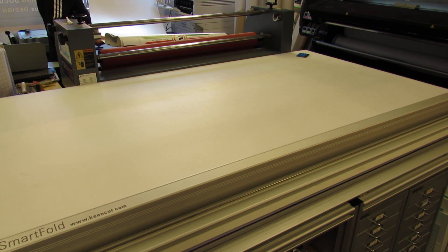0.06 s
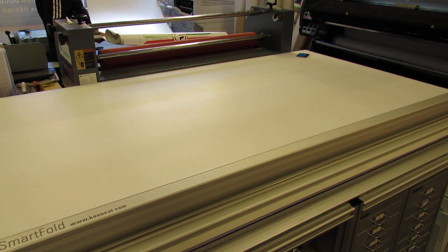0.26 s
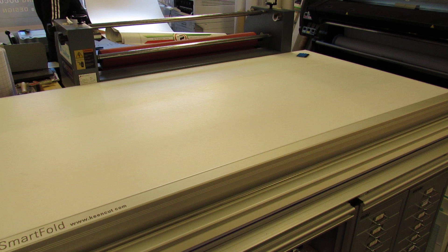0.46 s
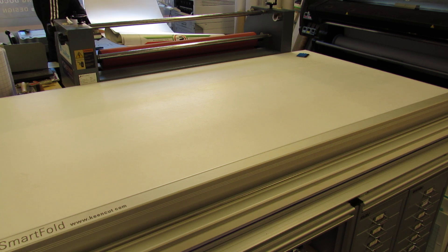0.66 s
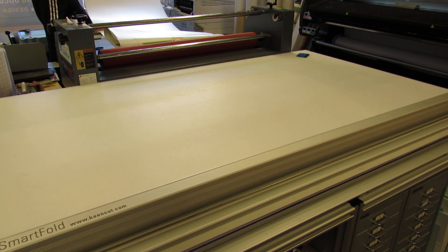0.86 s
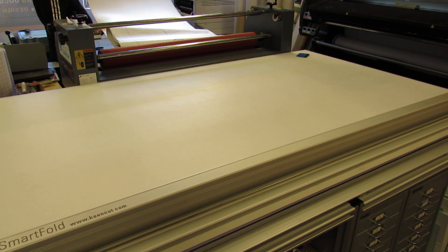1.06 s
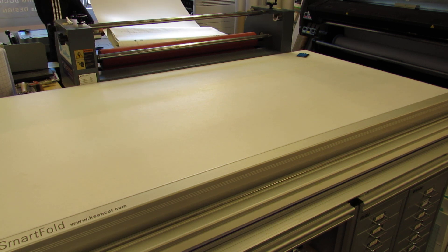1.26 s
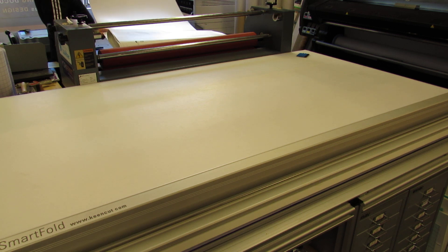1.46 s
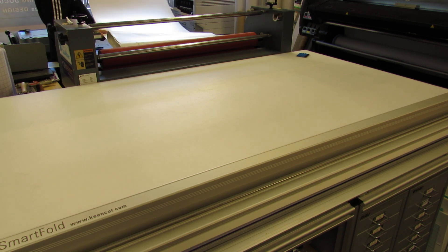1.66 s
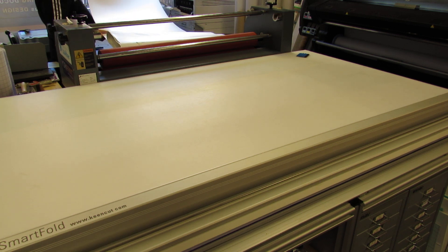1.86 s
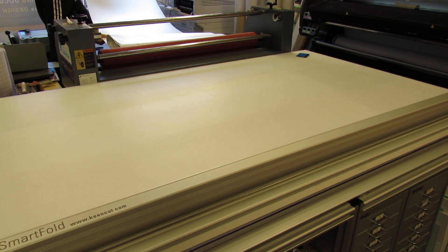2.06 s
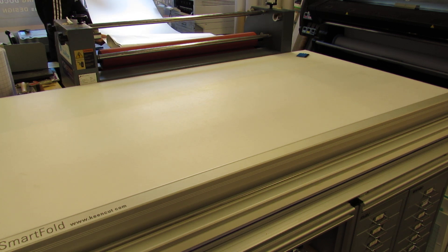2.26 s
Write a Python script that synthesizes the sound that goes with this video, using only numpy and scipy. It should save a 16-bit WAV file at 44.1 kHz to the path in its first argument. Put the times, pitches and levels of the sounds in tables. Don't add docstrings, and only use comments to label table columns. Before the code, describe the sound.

A stiff sheet slaps hard onto a bench twice, slides briefly, cracks sharply against a roller, then settles with soft dull thuds; steady motor hum and fan noise around, hard workshop room, close stereo microphone.

```python
import sys
import numpy as np
from scipy import signal
from scipy.fft import rfft, irfft, next_fast_len
from scipy.io import wavfile
from scipy.ndimage import map_coordinates

SR = 44100
rng = np.random.default_rng(int(sys.argv[2]) if len(sys.argv) > 2 else 0)


def output_pcm(signal):
    pcm = np.clip(np.atleast_2d(signal).T, -1, 1) * 32767
    wavfile.write(sys.argv[1], SR, np.round(pcm).astype(np.int16))


def gain_from_db(level_db):
    decades = np.asarray(level_db, float) / 20
    return 10 ** decades


N = 101430

# (frequency [Hz], rms level [dB], wander [dB])
MOTOR_TONES = [(49, -58.5, 2), (246.5, -49.5, 3), (494.3, -55.5, 2.5), (1036, -71, 2)]
# (frequency [Hz], level [dB])
MOTOR_WHINE = [(1564.5, -59.5), (1490, -70), (1639, -72)]
# (time [s], level on the tones [dB])
MOTOR_LOAD = [(0, 2), (.25, 1), (.45, 1.5), (.75, 1), (1.4, 2), (1.7, 0.5), (2.3, 0)]
TWIN_HZ, TWIN_DB, BEAT_S, QUIET_AT_S, TWIN_SHARE = 95.9, -48.5, 0.99, 0.7, 0.41
# (frequency [Hz], density [dB per Hz])
FAN_COLOUR = [(30, -22), (65, -21.5), (170, 1), (450, -2.5), (1300, -16), (2200, -27.5), (4000, -36.5),
              (15000, -37)]
FAN_DB, FAN_WANDER_DB, FAN_FOLLOWS_LOAD = -43.5, 0.8, 0.43

# (frequency [Hz], likeness [-1..1])
MOTOR_ALIKE = [(50, 0.11), (100, 0.65), (250, 0.95), (1500, 0.82)]
FAN_LIKENESS = [(60, 0.076), (180, 0.19), (550, 0.57), (1650, 0.58), (4970, 0.45), (15000, 0.062)]
TAIL_ALIKE = [(60, 0.1), (180, 0.66), (550, 0.68), (1650, 0.98), (4970, 0.94), (15000, 0.05)]
DIRECT_ALIKE = [(3000, 0.99), (6000, 0.94), (10000, 0.87), (15000, 0.41)]
# (frequency [Hz], t60 [s])
ROOM_T60 = [(150, 0.34), (1000, 0.46), (3000, 0.5), (8000, 0.44), (15000, 0.31)]
TAIL_BUILD_S = 0.0078

# (time [s], level [dB], fall t60 [s], tap over level [dB], boom over level [dB])
THUD_EVENTS = [(0.253, -36, 0.069, -24, 0), (0.295, -45, 0.16, -30, 0), (0.44, -36.5, 0.099, -32, 0),
               (0.857, -38, 0.13, -11, -8), (1.329, -43.5, 0.17, 2, -22), (1.42, -44, 0.58, -3, -29),
               (1.703, -37.5, 0.18, -2, -2), (1.718, -39.5, 0.13, -6, -1), (1.744, -45.5, 0.14, -16, 0),
               (1.776, -47, .15, -12, -17), (1.854, -38, 0.085, -42.5, -22.5),
               (1.910, -38, 0.13, -11.5, -26), (1.936, -40.5, 0.15, -23, -24),
               (1.981, -44.5, 0.094, -25, -17)]
# (frequency [Hz], width [Hz], level [dB])
BOARD_RESONANCES = [(271, 51, -1), (380, 99, -0.5), (525, 77, -1.5)]
BENCH_BOOM = [(103, 81, -11.5), (171, 55, 3.5), (221, 72, -13)]
# (frequency [Hz], density [dB])
TAP_COLOUR = [(300, -50.5), (600, 13), (1000, 7.5), (1800, -2), (2400, -25), (3400, -14.5), (5000, -18),
              (15000, -19.5)]
# (frequency [Hz], level [dB], t60 [s])
BENCH_MODES = [(156, 0, 0.25), (192, -3, .1), (496, -4, 0.17), (1012, -13, 0.22), (390, -3, .15)]
TABLE_MODES = [(169.7, -3.5, 0.56), (217.5, 1, 0.27), (272, -0.5, 0.26)]
BENCH_S, BENCH_DB, TABLE_S, TABLE_DB = 1.715, -6.5, 0.27, -7
THUD_RISE_S, TAP_RISE_S, THUD_WET_DB = 0.01, 0.0086, -3.5

# (time [s], level [dB], hiss over it [dB], scrape over it [dB])
SLIDE_COURSE = [(0.296, -34.5, -14, -18), (.38, -45, -3, -20), (.45, -39.5, -8.5, -11),
                (.5, -39.5, -21, -10), (.68, -48, -13, -29), (.76, -53, -4, -19), (.82, -45.5, -3.5, -20),
                (.87, -45, 0, -2), (.91, -50, 5.5, 5.5), (0.945, -61.5, 11, -14), (.985, -51.5, -8, -15),
                (1.12, -51, -6, -27), (1.2, -53.5, -3, -18), (1.27, -53.5, 1, -20), (1.33, -49, -7.5, -12),
                (1.48, -65, -6, -16), (1.62, -60, -5, -24), (2.3, -66, 2, -20)]
# (frequency [Hz], density [dB])
RUB_COLOUR = [(300, 1.5), (800, -3), (1200, 2.5), (2600, -4), (4000, -14), (8000, -23), (15000, -58)]
HISS_COLOUR = [(1500, 8), (3000, -13.5), (4000, -3), (6300, -1.5), (9000, -2), (13000, -8.5), (15000, -10)]
# (frequency [Hz], width [Hz], level [dB])
SCRAPE_RESONANCE = [(2500, 800, 0)]

# (time [s], level [dB])
SNAP_EVENTS = [
    (.9886, -18),
    (.9930, -15),
    (1.0006, -19),
]
# (frequency [Hz], width [Hz], level [dB])
CRACK_RESONANCES = [(594, 98, 2), (895, 190, 5), (4100, 3000, 6), (8400, 7200, -25)]
# (frequency [Hz], density [dB])
RATTLE_COLOUR = [(300, -14), (550, 8.5), (950, -4), (1500, -8.5), (4200, -4.5), (6500, -9.5),
                 (10000, -10.5), (15000, -33)]
SNAP_TO_ROOM = [(250, 6), (550, 12), (950, 9.5), (1500, -12), (2500, -2), (4300, 3.5), (8000, -3.5),
                (15000, -12)]
# (frequency [Hz], level [dB], t60 [s])
ROLLER_MODES = [(548, 0, 0.086), (480, -3.5, 0.091), (900, -5, 0.09), (952, -8, .08)]
SNAP_GAIN_DB, RATTLE_DB, ROLLER_DB, SNAP_WET_DB, SNAP_TAIL_DB = 6, -6.5, -4, -1.5, 1.5

# (time [s], level [dB], rise [s], fall t60 [s])
SLAP_EVENTS = [
    (.2260, -27.5, 0.012, 0.14),
    (.5150, -27.5, 0.0096, 0.44),
]
# (time [s], level [dB], rise [s], fall t60 [s])
EDGE_CONTACTS = [
    (0.2229, -16, 0.00026, 0.0022),
    (0.2245, -25, 0.0016, 0.049),
]
# (time [s], level [dB], fall t60 [s])
FIRST_SLAP_HITS = [(.2318, -25, .02), (.2357, -25, .015), (.2388, -24, .012), (.2422, -28, .012),
                   (.2452, -28, .02), (.2535, -28, .02)]
SECOND_SLAP_HITS = [(.5190, -31, .02), (.5250, -32, .02), (.5310, -33, .03), (.5470, -35, .03),
                    (.5550, -36, .03)]
# (frequency [Hz], density [dB])
EDGE_COLOUR = [(150, -11), (500, 4.5), (2000, -17), (4000, -30), (8000, -38), (15000, -48)]
FIRST_COLOUR = [(90, -17), (250, 0.5), (450, -1), (750, -10), (1080, 2.5), (2200, -2.5), (6300, -5),
                (15000, -12.5)]
SECOND_COLOUR = [(150, -42), (350, -6.5), (750, -3.5), (1100, 1.5), (1600, 1), (2400, -2.5), (4000, -5.5),
                 (15000, -17.5)]
# (frequency [Hz], level [dB], t60 [s])
FRAME_MODES = [(1040, -1, 0.14), (1060, -5, 0.094), (1670, 0, 0.25), (1970, 9, 0.11), (6620, 33, 0.062),
               (6100, 15, .04), (3060, -11, 0.11)]
SHEET_MODES = [(1521, 0, .045), (1460, -6, .05), (960, -9, .1), (1995, -11, .1), (2262, -10, .1),
               (3806, -11, .08), (1838, -12, .1)]
FRAME_S, SHEET_S, SHEET_DB, RING_DB = 0.2355, 0.530, 4, -25
HIT_RISE_S, SLAP_WET_DB, BURST_WET_DB, SENT_DB = 0.001, 1, -4.5, -3

# (frequency [Hz], level [dB])
LEFT_OVER_RIGHT = [(60, -3), (240, 4), (950, 1.5), (3770, 0.0), (15000, -0.5)]
TREBLE_FALL = [(14800, 0), (15600, -14), (16500, -40)]
NOTCH_HZ, NOTCH_WIDE_HZ, NOTCH_LEFT = 673.6, 367, 0.13


def unit(x):
    return x / np.sqrt(np.mean(x ** 2) + 1e-20)


def along(points, hz):
    f, v = np.transpose(points)
    return np.interp(np.log(hz + 1), np.log(f + 1), v)


def over_time(times, values):
    return np.interp(np.arange(N) / SR, times, values)


def wobble(count):
    knots = rng.standard_normal(int(N * count / SR) + 4)
    return map_coordinates(knots, [np.arange(N) * count / SR])


def filtered(x, response):
    m = next_fast_len(N + SR // 2)
    return irfft(rfft(x, m) * response(np.fft.rfftfreq(m, 1 / SR)), m)[..., :N]


def noise(spectrum, grit_db, shape=1):
    def colour(hz):
        gain = gain_from_db(along(spectrum, hz))
        return gain / np.sqrt(np.mean(gain ** 2))
    white = unit(gain_from_db(grit_db * wobble(count=900)) * rng.standard_normal(N))
    return filtered(shape * white, colour)


def resonances(table):
    def response(f):
        total = 0
        for k, (centre, width, db) in enumerate(table):
            damping = 1j * f * width
            total = total + (-1) ** k * gain_from_db(db) * damping / (centre * centre - f * f + damping)
        return total
    return response


def shaken(table):
    return unit(filtered(rng.standard_normal(N), resonances(table)))


def blow(s, db, rise, t60):
    t = np.arange(N) / SR - s
    return gain_from_db(db - 60 * np.clip(t - rise, 0, None) / t60) * np.clip(t / rise, 0, 1)


def ring(modes, s):
    t = np.clip(np.arange(N) / SR - s, 0, None)
    top = max(db for _, db, _ in modes)
    tones = sum(gain_from_db(db - top + RING_DB - 60 * t / t60) * np.sin(2 * np.pi * hz * t) for hz, db, t60 in modes)
    return tones * (1 - np.exp(-t / 0.0012))


def spread(pair, alike):
    def mid_side(hz):
        turn = np.arccos(np.clip(along(alike, hz), -1, 1)) / 2
        return np.array([np.cos(turn), np.sin(turn)])
    mid, side = filtered(pair, mid_side)
    return np.array([mid + side, mid - side])


def room(x, wet_db):
    hz, t, z = signal.stft(rng.standard_normal((2, SR)), SR, nperseg=256)
    tail = signal.istft(z * gain_from_db(-60 * t / along(ROOM_T60, hz)[:, None]), SR, nperseg=256)[1]
    tail = tail * (1 - np.exp(-np.arange(tail.shape[1]) / SR / TAIL_BUILD_S))
    wet = signal.fftconvolve(x[None], tail / np.linalg.norm(tail[0]), axes=1)[:, :N]
    direct = spread(np.array([x, np.roll(x, SR // 1000)]), DIRECT_ALIKE)
    return direct + gain_from_db(wet_db) * spread(wet, TAIL_ALIKE)


def hum():
    t = np.arange(N) / SR
    swing = np.cos(2 * np.pi * (t - QUIET_AT_S) / BEAT_S)
    beat = np.sqrt(np.abs(1 + TWIN_SHARE ** 2 - 2 * TWIN_SHARE * swing))
    total = gain_from_db(TWIN_DB) * beat * np.sin(2 * np.pi * TWIN_HZ * t + 0.22 * wobble(count=3))
    load_db = over_time(*np.transpose(MOTOR_LOAD))
    for hz, db, wander_db in MOTOR_TONES:
        level = gain_from_db(db + 3.5 + load_db + wander_db * wobble(count=22))
        total = total + level * np.sin(2 * np.pi * hz * t + 0.67 * wobble(count=10))
    return total


def whine():
    t = np.arange(N) / SR
    return sum(gain_from_db(db + 1.5 * wobble(count=8)) * np.sin(2 * np.pi * hz * t + 0.4 * wobble(count=6))
               for hz, db in MOTOR_WHINE)


def fan():
    load_db = over_time(*np.transpose(MOTOR_LOAD))
    level = gain_from_db(FAN_FOLLOWS_LOAD * load_db + FAN_WANDER_DB * wobble(count=8))
    return noise(FAN_COLOUR, grit_db=0.5) * level


def machines():
    motors = spread(np.array([hum(), hum()]), MOTOR_ALIKE)
    fans = spread(np.array([fan(), fan()]), FAN_LIKENESS)
    return whine() + motors + gain_from_db(FAN_DB) * fans


def thuds():
    board, boom, tap = 0, 0, 0
    for s, db, t60, tap_db, boom_db in THUD_EVENTS:
        board = board + blow(s, db, THUD_RISE_S, t60)
        boom = boom + blow(s, db + boom_db, 2 * THUD_RISE_S, t60)
        tap = tap + blow(s, db + tap_db, TAP_RISE_S, 1.01 * t60)
    contact = board * shaken(BOARD_RESONANCES) + boom * shaken(BENCH_BOOM) + noise(TAP_COLOUR, 0.75, tap)
    bench = gain_from_db(BENCH_DB) * ring(BENCH_MODES, BENCH_S)
    table_top = gain_from_db(TABLE_DB) * ring(TABLE_MODES, TABLE_S)
    return room(contact + bench + table_top, THUD_WET_DB)


def slide():
    s, db, hiss_db, scrape_db = np.transpose(SLIDE_COURSE)
    level = gain_from_db(np.interp(np.arange(N) / SR, s, db, left=-120) + 1.2 * wobble(count=30))
    rub = noise(RUB_COLOUR, grit_db=1.0)
    hiss = gain_from_db(over_time(s, hiss_db)) * noise(HISS_COLOUR, grit_db=-0.5)
    scrape = gain_from_db(over_time(s, scrape_db)) * shaken(SCRAPE_RESONANCE)
    return room(level * (rub + hiss + scrape), 0.33)


def snaps():
    spikes, tail_spike = np.zeros(N), np.zeros(N)
    for s, db in SNAP_EVENTS:
        spikes[round(s * SR)] = -gain_from_db(db + SNAP_GAIN_DB)
    tail_spike[round(SNAP_EVENTS[1][0] * SR)] = gain_from_db(SNAP_TAIL_DB - 32)
    crack = filtered(spikes, lambda f: sum(resonances([row])(f) for row in CRACK_RESONANCES))
    after = sum(blow(s, db + RATTLE_DB, 0.00032, 0.015006) for s, db in SNAP_EVENTS)
    rattle = noise(RATTLE_COLOUR, 0.66, after)
    roller = gain_from_db(ROLLER_DB) * ring(ROLLER_MODES, SNAP_EVENTS[2][0])
    sent = filtered(tail_spike, lambda hz: gain_from_db(along(SNAP_TO_ROOM, hz)))
    return room(crack + rattle + roller, SNAP_WET_DB - 2.5) + room(sent, 30.7)


def slap_hits(table):
    return sum(blow(s, db, HIT_RISE_S, t60) for s, db, t60 in table)


def first_slap():
    s, _, rise, _ = SLAP_EVENTS[0]
    edge = noise(EDGE_COLOUR, 1.3, sum(blow(*row) for row in EDGE_CONTACTS))
    burst = noise(FIRST_COLOUR, 1.4, blow(*SLAP_EVENTS[0]) + slap_hits(FIRST_SLAP_HITS))
    spike = filtered(np.arange(N) == round((s + rise) * SR), lambda hz: gain_from_db(along(FIRST_COLOUR, hz)))
    sent = spike * np.linalg.norm(burst) / np.linalg.norm(spike) * gain_from_db(SENT_DB - 31)
    near = room(edge + burst + ring(FRAME_MODES, FRAME_S), SLAP_WET_DB + BURST_WET_DB)
    return near + room(sent, 30 + SLAP_WET_DB)


def second_slap():
    burst = noise(SECOND_COLOUR, 1.3, blow(*SLAP_EVENTS[1]) + slap_hits(SECOND_SLAP_HITS))
    return room(burst + gain_from_db(SHEET_DB) * ring(SHEET_MODES, SHEET_S), SLAP_WET_DB - 3.0)


def scene():
    return machines() + thuds() + slide() + snaps() + first_slap() + second_slap()


def band_limit(x):
    return signal.sosfilt(signal.butter(12, 15050, fs=SR, output="sos"), x)


def record(dry):
    def ports(f):
        edge = NOTCH_HZ ** 2 - f * f
        width = 1j * f * NOTCH_WIDE_HZ
        notch = (edge + width * NOTCH_LEFT) / (edge + width)
        bass_cut = (f / (f - 35j)) ** 2
        balance_db = np.outer([0.5, -0.5], along(LEFT_OVER_RIGHT, f))
        return notch * bass_cut * gain_from_db(balance_db + along(TREBLE_FALL, f))
    return band_limit(filtered(dry, ports))


dry = scene()
out = record(dry)
output_pcm(out)
```